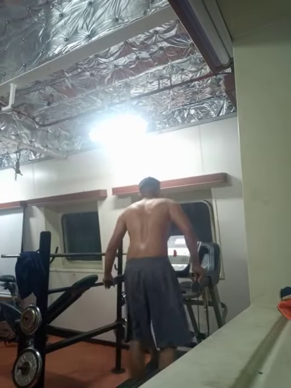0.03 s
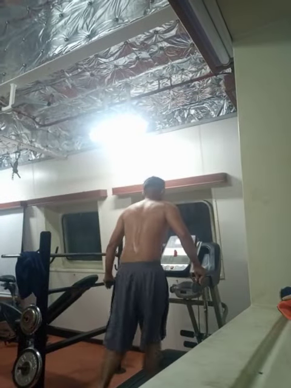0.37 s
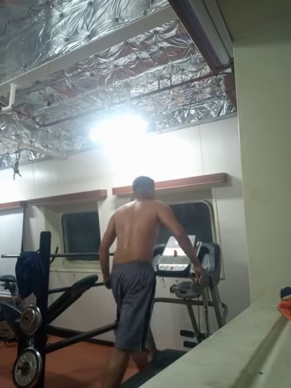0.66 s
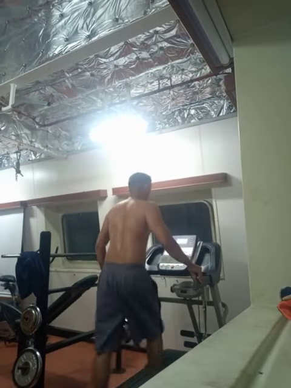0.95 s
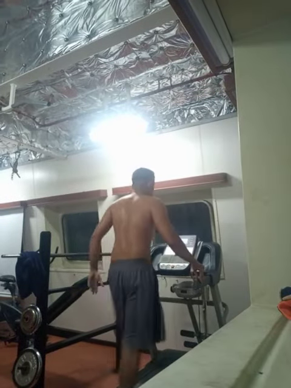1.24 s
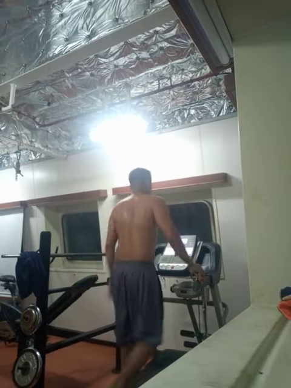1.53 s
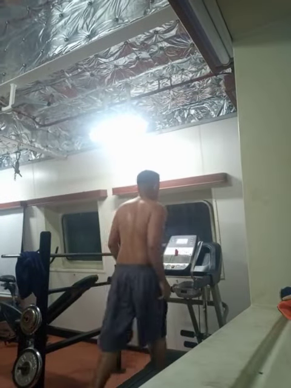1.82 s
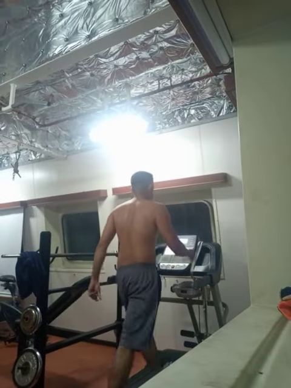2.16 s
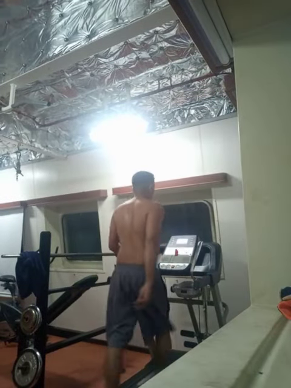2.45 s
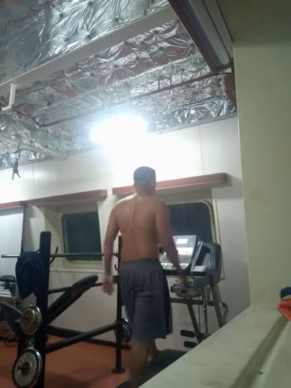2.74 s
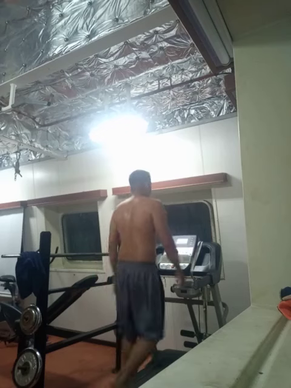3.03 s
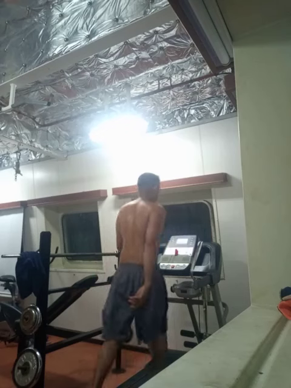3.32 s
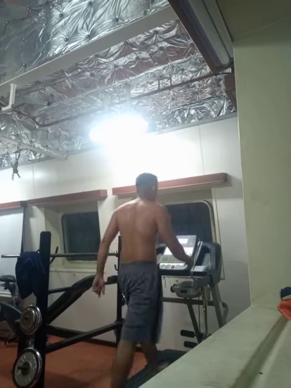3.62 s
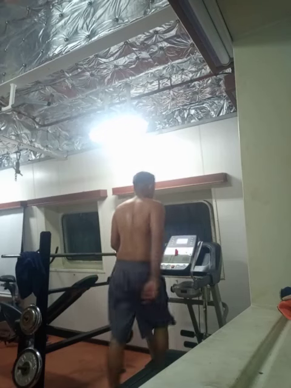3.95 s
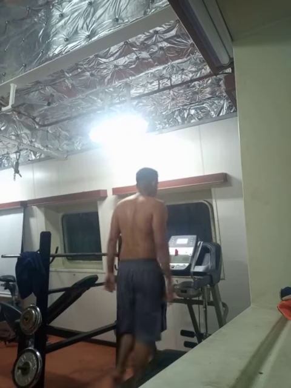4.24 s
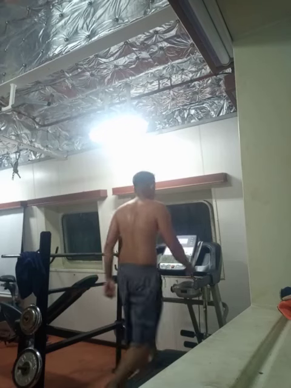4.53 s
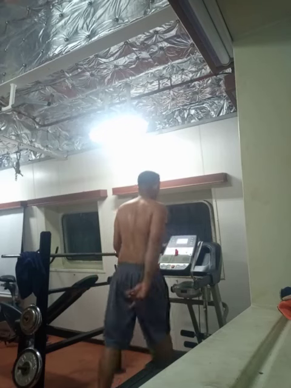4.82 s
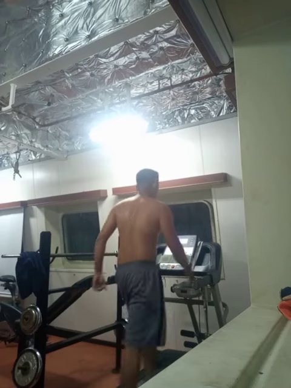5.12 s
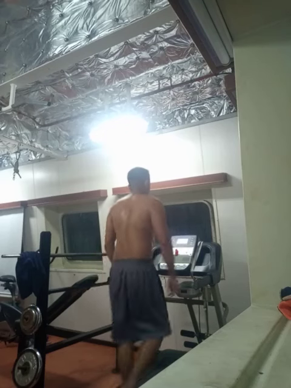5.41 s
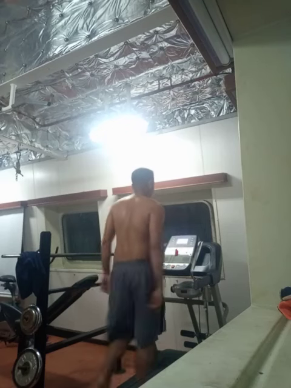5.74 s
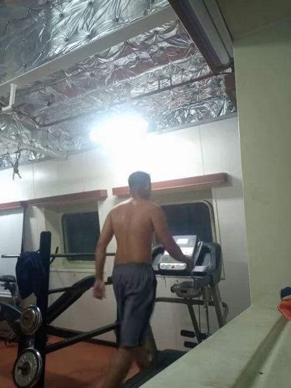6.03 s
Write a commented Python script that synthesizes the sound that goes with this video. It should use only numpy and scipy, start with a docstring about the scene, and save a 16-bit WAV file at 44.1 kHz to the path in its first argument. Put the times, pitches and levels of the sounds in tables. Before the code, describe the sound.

A strong, low, steady hum from a ship's machinery fills a small gym cabin for the whole six seconds, heard from one microphone in the room. Beneath it lie a deep rumble and a churning roar coming through the hull. Ventilation air hisses constantly, with a faint hollow ring from panels and ducts.

Someone walks on a treadmill throughout. The steps are soft, slightly uneven swells of low rub and swish, about three a second, half buried in the drone. Brief, light scuffs of a foot on the belt come now and then, more noticeably at about 1.1 and 1.8 seconds, with the clearest at 5.2 seconds.

The roar and air swell slightly from about 1.5 to 3 seconds, settle by 4, and rise again after 5.5. With each swell the hum softens a little and throbs faintly. The overall loudness stays nearly even.

```python
"""Treadmill in a ship's gym

One microphone in the cabin. From beyond the walls, machinery drones through the hull: one strong
low hum over a rumble and a roar. In the room, ventilation air rushes and rings the panels and ducts.
Someone walks on a treadmill: each tread presses the belt down, and now and then a foot scuffs it."""
import sys
import numpy as np
from scipy import signal
from scipy.fft import rfft, irfft
from scipy.io import wavfile
from scipy.ndimage import uniform_filter1d

SR = 44100
rng = np.random.default_rng(int(sys.argv[2]) if len(sys.argv) > 2 else 0)


def generate_wav(sig):
    """Save sig (samples, or channels by samples) to the path in sys.argv[1] as 16-bit PCM at SR."""
    pcm = np.round(np.clip(np.atleast_2d(sig).T, -1, 1) * 32767).astype(np.int16)
    wavfile.write(sys.argv[1], SR, pcm)


N = 272097
TIME = np.arange(N) / SR
FREQS = np.fft.rfftfreq(N, 1 / SR)

# The machinery's load, as the rise of its roar: time_s, rise_db
MACHINE_LOAD = [(0.0, -0.86), (1.1, -0.24), (1.7, 1.0), (2.4, 2.5), (2.9, 2.6), (3.5, 0.97), (4.0, 0.0),
                (5.55, 0.42), (6.17, 3.5)]
# Resonances of the cabin's panels and ducts: centre_hz, width_hz, lift_db
CABIN_RESONANCES = [(254, 17, 4), (313.4, 25, 5), (354, 11, 3), (480, 24, 3.5), (550.8, 16, 8.5),
                    (853.3, 48, 8.5), (971, 43, 5), (1158, 34, 5.5), (1220, 38, 2), (1289, 75, 9),
                    (1510, 19, 1.5), (1620, 18, 5.5), (2040, 18, 5), (2235, 110, 4.5), (2830, 90, 3.5),
                    (3050, 81, 3.5)]
# Spectrum of the rumble in the hull: frequency_hz, relative_db
RUMBLE_SPECTRUM = [(15, -31.5), (35, -23.5), (65, -11), (100, -8), (122, 0.5), (150, -6.5), (200, -7.5),
                   (300, -32.5)]
# Spectrum of the machinery's roar, and of the belt's low rub: frequency_hz, relative_db
ROAR_SPECTRUM = [(120, -24), (190, 0), (260, -1.5), (368, -1.5), (395, -8.5), (560, -10.5), (700, -14.5),
                 (1000, -22), (1500, -39)]
# Spectrum of the ventilation rush: frequency_hz, relative_db
AIR_SPECTRUM = [(400, -5), (900, 0.5), (1070, -2.5), (1400, 3.5), (1850, 0), (2250, -1), (3200, -3.5),
                (4050, -6), (4350, -14.5), (5500, -11.5), (5900, -17.5), (6150, -28), (7200, -33.5),
                (8000, -51)]
# The walker's weight pressing the belt onto the deck: peak_s, rub_db, swish_db
BELT_TREADS = [(0.33, -28.5, -40), (0.78, -32.5, -37), (1.1, -35, -39.5), (1.43, -32, -40.5),
               (1.6, -28, -43), (1.8, -25.5, -34.5), (2.0, -35, -36.5), (2.3, -28.5, -38),
               (2.77, -28, -36.5), (3.1, -29, -44.5), (3.68, -30, -42), (4.14, -31.5, -43),
               (4.36, -33, -41.5), (4.86, -32, -41), (5.04, -31.5, -43.5), (5.24, -33, -38),
               (5.38, -29.5, -44), (5.76, -26.5, -37), (5.91, -32, -41)]
# Spectrum of the belt's swish on the deck: frequency_hz, relative_db
SWISH_SPECTRUM = [(400, -0.5), (850, 1.5), (1400, 2.5), (2200, -1.5), (3200, -3), (4300, -9.5),
                  (5700, -13.5), (6300, -27.5), (7500, -42)]
# Feet scuffing the belt: start_s, level_db, slide_s, fizz_relative_db
FOOT_SCUFFS = [(0.576, -48.5, 0.02, -37), (0.746, -49.5, 0.052, -44), (1.052, -41.5, 0.043, -27.5),
               (1.802, -42.5, 0.036, -24), (2.752, -45, 0.088, -40), (3.342, -48, .04, -34),
               (4.834, -47, 0.024, -40), (5.219, -37, 0.027, -30.5)]
# Spectrum of a sole rubbing the belt: frequency_hz, relative_db
SCUFF_SPECTRUM = [(600, -9.5), (2000, -8), (3400, 4.5), (4300, -4.5), (5700, -3), (6300, -18.5),
                  (7500, -33), (9000, -44.5)]


def gain_of(db):
    """Decibels to amplitude."""
    return 10 ** (np.asarray(db) / 20)


def unit_rms(x):
    """Scales to an rms of one."""
    return x / np.sqrt(np.mean(x ** 2) + 1e-20)


def shaped_noise(response):
    """Noise of unit rms, shaped by one gain for each of FREQS."""
    return unit_rms(irfft(rfft(rng.standard_normal(N)) * response, N))


def drift(hz):
    """A random wander, with changes up to about hz a second."""
    return shaped_noise(np.exp(-(FREQS / hz) ** 2))


def resonance(centre_hz, width_hz):
    """A peak of height one over FREQS."""
    return 1 / (1 + (2 * (FREQS - centre_hz) / width_hz) ** 2)


def cabin_noise(spectrum):
    """Noise with a smooth spectrum, lifted where the panels and ducts ring."""
    hz, db = np.transpose(spectrum)
    slope_db = np.interp(np.log(FREQS + 1), np.log(hz), db)
    lift_db = sum(lift * resonance(centre, width) for centre, width, lift in CABIN_RESONANCES)
    roll_off = 1 / (1 + (FREQS / (1.03 * hz[-1])) ** 6)
    return shaped_noise(gain_of(slope_db + lift_db) * roll_off)


def hull_hum(swell_db, pitch_hz=163.2, waver_hz=0.35, beat_hz=5.8):
    """As the roar swells, the hum rises slightly in pitch, sounds quieter,
    and throbs more against a faint tone just above it."""
    hz = pitch_hz + 0.29 * swell_db + waver_hz * drift(1.9)
    main = gain_of(-17 - 0.97 * swell_db) * np.sin(2 * np.pi * np.cumsum(hz) / SR)
    neighbour_hz = hz + beat_hz + waver_hz * drift(2.5)
    neighbour = gain_of(-40 + 2.5 * swell_db) * np.sin(2 * np.pi * np.cumsum(neighbour_hz) / SR)
    return main + neighbour


def machinery(load_db, rumble_db=-28, roar_db=-28, churn_db=1.0):
    """A deep rumble in the hull and a churning roar above it swell together with the load."""
    roar = gain_of(roar_db + load_db + churn_db * drift(13)) * cabin_noise(ROAR_SPECTRUM)
    rumble = gain_of(rumble_db + 0.97 * load_db) * cabin_noise(RUMBLE_SPECTRUM)
    return rumble + roar


def patchy(hiss, depth_db=2.5, span_s=0.04, span_hz=200, full_hz=5000):
    """Small patches of a hiss swell and fade on their own, most of all in the treble."""
    frame, hop = 1024, 256
    hz, _, bands = signal.stft(hiss, SR, nperseg=frame, noverlap=frame - hop)
    patches = uniform_filter1d(rng.standard_normal(bands.shape), round(span_hz / hz[1]), axis=0)
    patches = unit_rms(uniform_filter1d(patches, round(span_s * SR / hop), axis=1))
    swing_db = depth_db * np.sqrt(np.minimum(hz / full_hz, 1))[:, None]
    _, uneven = signal.istft(bands * gain_of(swing_db * patches), SR, nperseg=frame, noverlap=frame - hop)
    return unit_rms(uneven[:N])


def ventilation(swell_db, level_db=-37.5, eddy_db=1.08):
    """Rushing air, a little louder as the roar swells, made slightly uneven by eddies."""
    rush_db = level_db + 0.64 * swell_db + eddy_db * drift(50)
    return gain_of(rush_db) * patchy(cabin_noise(AIR_SPECTRUM))


def flutter(rate_hz=43.07, depth_db=1.0):
    """A gain that gives the broad noise a faint, fast, regular flutter."""
    return gain_of(depth_db * np.sin(2 * np.pi * rate_hz * TIME))


def belt_treads(half_tread_s=0.052):
    """Under each tread the belt drags on the deck: a soft swell of low rub and swish."""
    rub, swish = cabin_noise(ROAR_SPECTRUM), cabin_noise(SWISH_SPECTRUM)
    out = np.zeros(N)
    for peak_s, rub_db, swish_db in BELT_TREADS:
        weight = np.exp(-((TIME - peak_s) / half_tread_s) ** 2)
        out += weight * (gain_of(rub_db) * rub + gain_of(swish_db) * swish)
    return out


def foot_scuffs(grain_db=3, rise_s=0.0048, tail_s=0.027):
    """Grainy friction noise bites, slides and dies in the cabin; crisp scuffs carry a fizz."""
    rub = cabin_noise(SCUFF_SPECTRUM)
    fizz = shaped_noise(resonance(centre_hz=10000, width_hz=7000))
    grip = unit_rms(gain_of(grain_db * drift(200)))  # the sole catches and slips
    out = np.zeros(N)
    for start_s, level_db, slide_s, fizz_db in FOOT_SCUFFS:
        age_s = np.maximum(TIME - start_s, 0)
        rise = 1 - np.exp(-age_s / rise_s)
        tail = np.exp(-np.maximum(age_s - slide_s, 0) / tail_s)
        first_bite = np.exp(-age_s / (2 * slide_s))  # the fizz fades as the sole settles
        out += gain_of(level_db) * rise * tail * (rub + gain_of(fizz_db) * first_bite * fizz)
    return grip * out


def scene():
    """What the microphone hears, in mono: the ship's drone, the air and the treadmill."""
    load_db = np.interp(TIME, *np.transpose(MACHINE_LOAD))
    hum = hull_hum(load_db)
    broad_noise = machinery(load_db) + ventilation(load_db) + belt_treads()
    return (hum + flutter() * broad_noise + foot_scuffs())[None]


def record(dry, hiss_db=-80, target_db=-18, squeeze=0.36, window_s=0.038, cutoff_hz=15500):
    """Faint microphone hiss, a gain control that steadies the level, then the band limit."""
    heard = dry + gain_of(hiss_db) * rng.standard_normal(dry.shape)
    window = round(window_s * SR)
    power_db = 10 * np.log10(uniform_filter1d(heard[0] ** 2, window) + 1e-12)
    excess_db = uniform_filter1d(power_db - target_db, window // 2 + 1)
    steadied = heard / gain_of(squeeze * excess_db)
    low_pass = signal.firwin(255, cutoff_hz, window=("kaiser", 9), fs=SR)
    return signal.filtfilt(low_pass, 1, steadied)


dry = scene()
out = record(dry)
generate_wav(out)
```